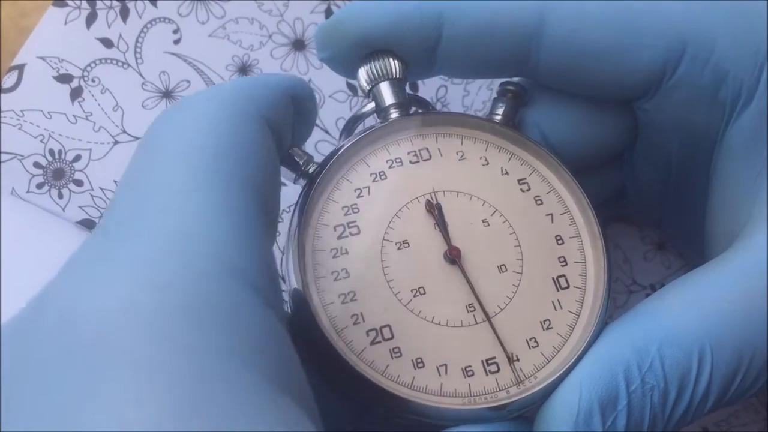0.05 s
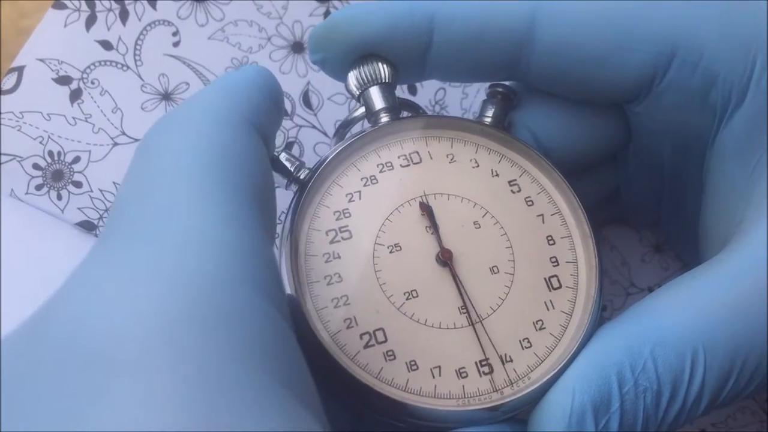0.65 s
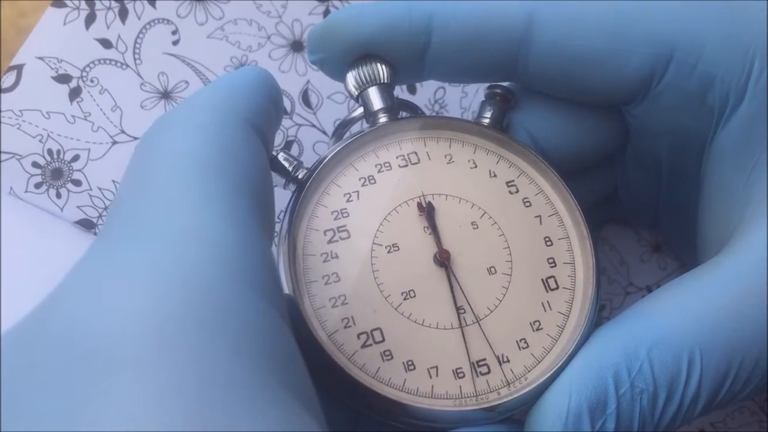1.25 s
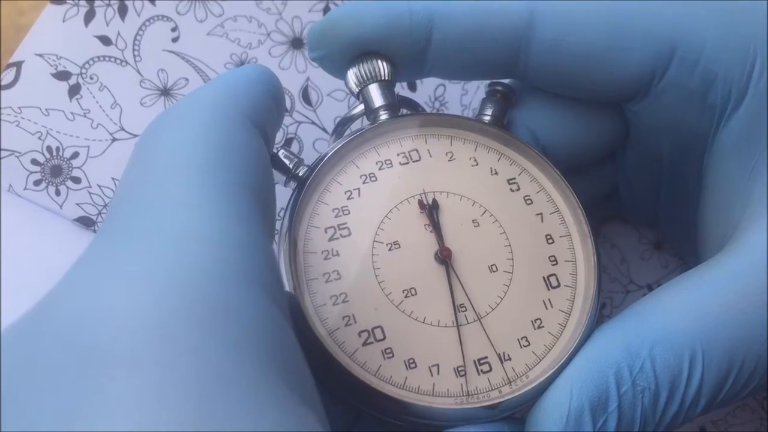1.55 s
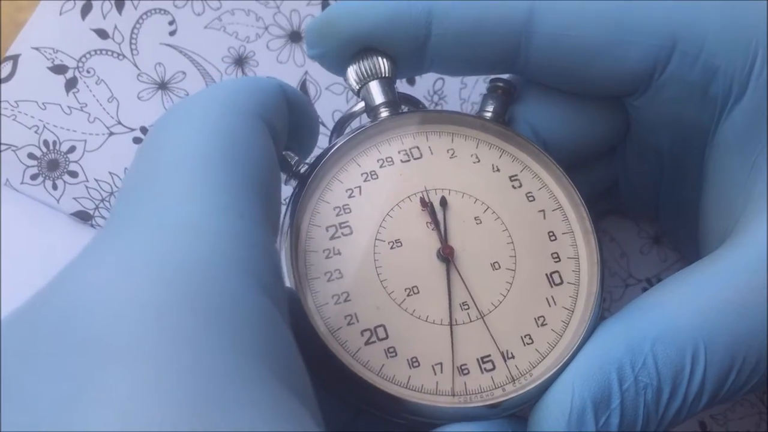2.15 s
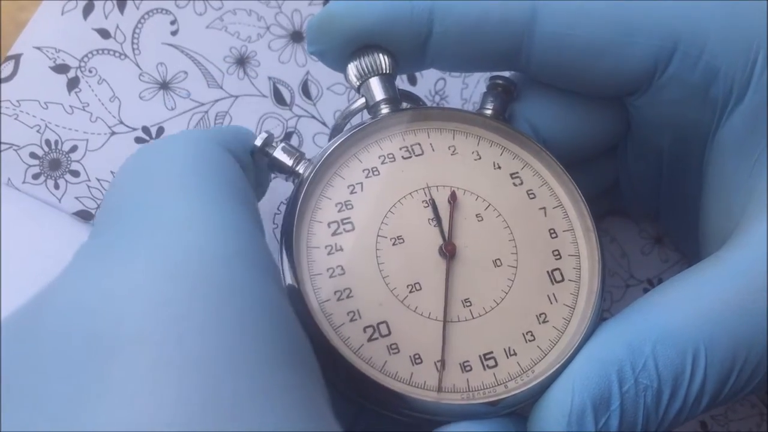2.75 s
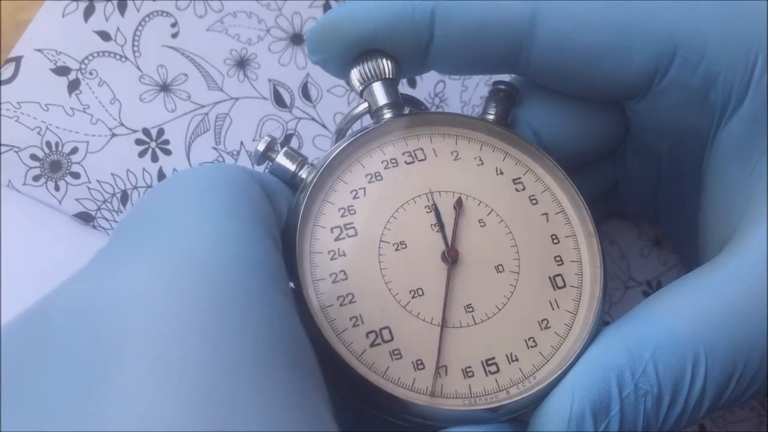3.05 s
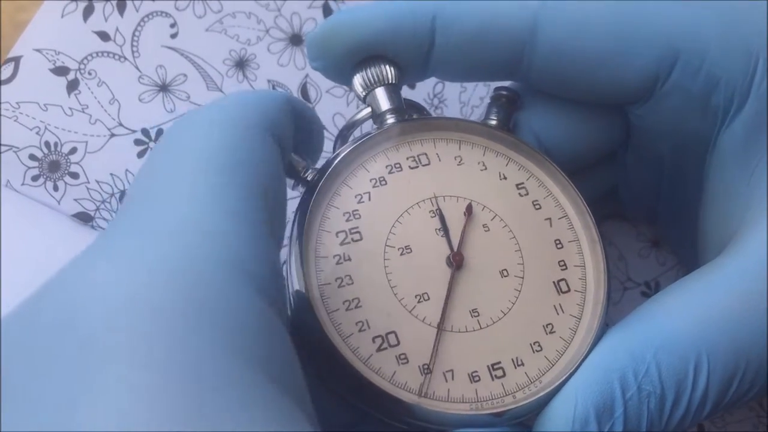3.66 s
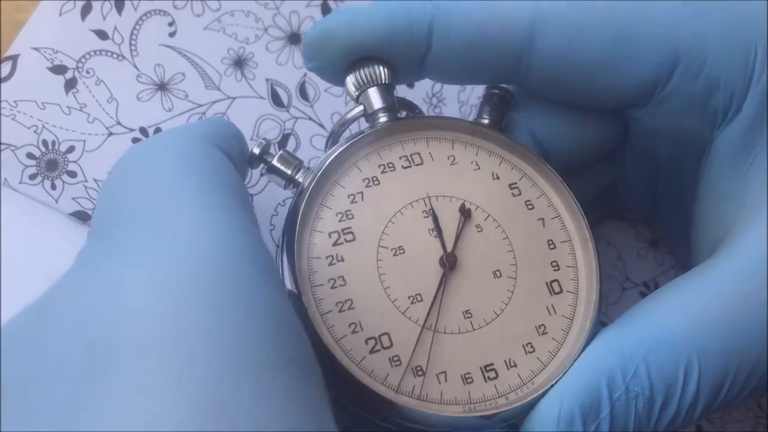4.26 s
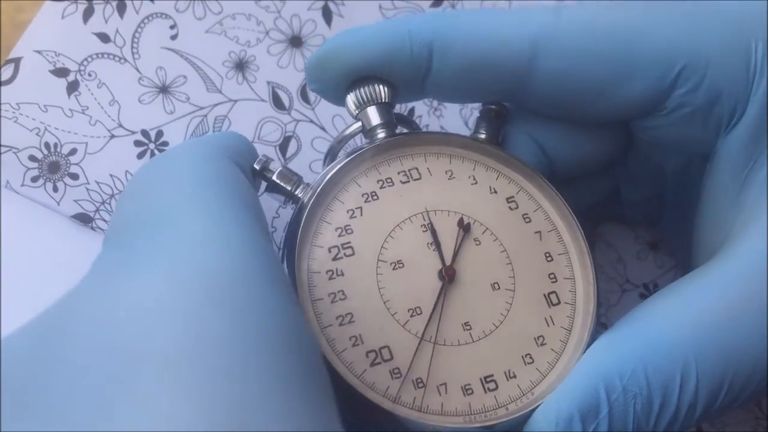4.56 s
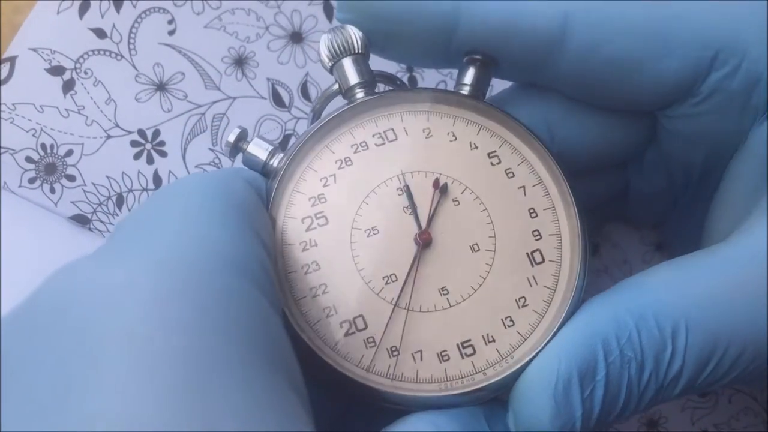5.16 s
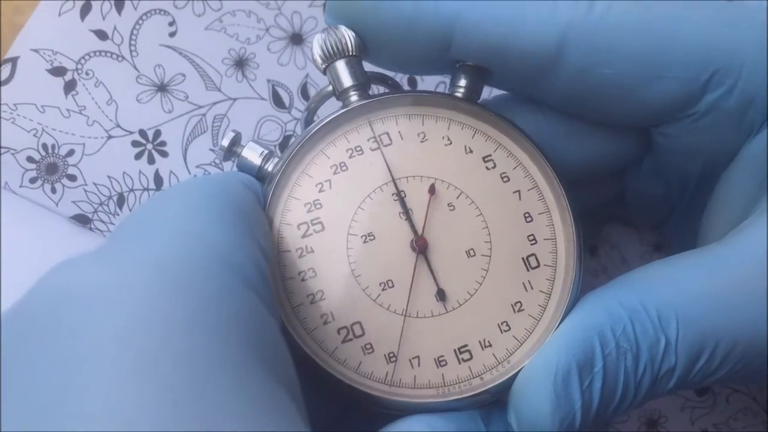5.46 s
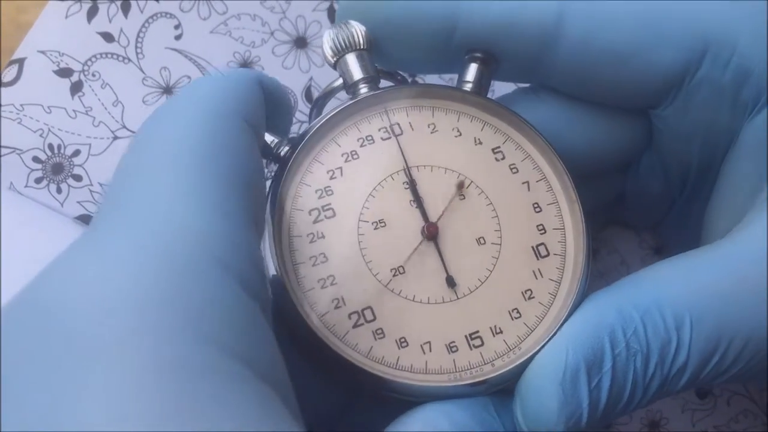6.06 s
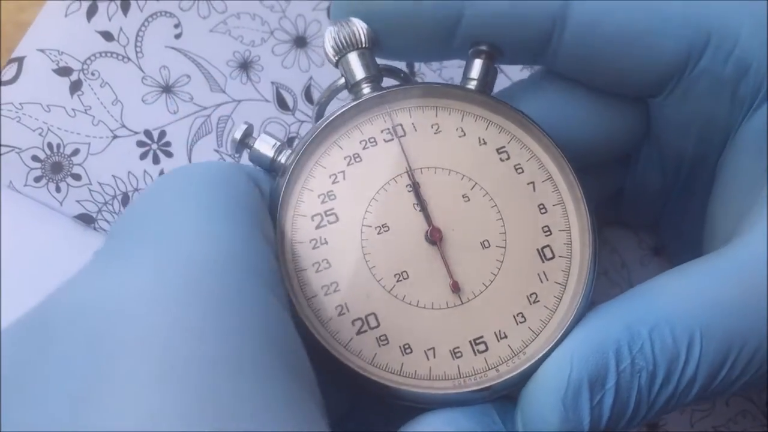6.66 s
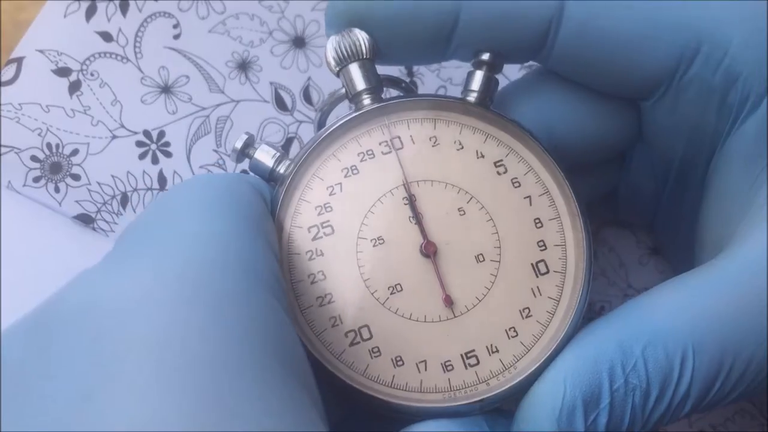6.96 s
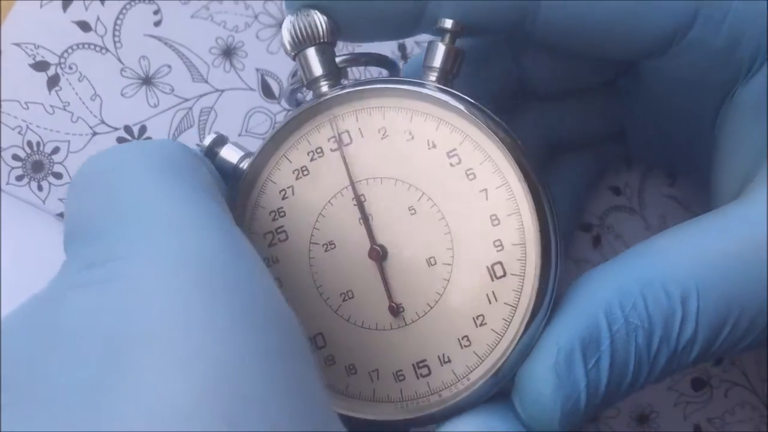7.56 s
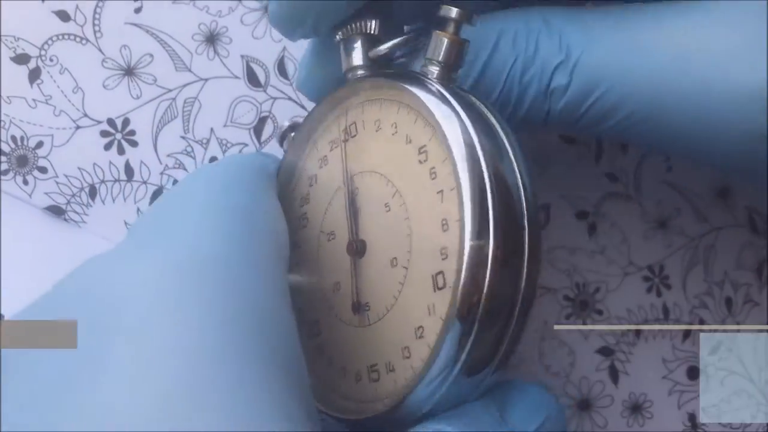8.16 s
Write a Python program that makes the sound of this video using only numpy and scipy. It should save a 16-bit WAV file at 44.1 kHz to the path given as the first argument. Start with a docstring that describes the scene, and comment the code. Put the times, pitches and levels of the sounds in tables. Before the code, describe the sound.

A steel mechanical stopwatch ticks faintly, about five beats a second, close to the microphone in a quiet room with a low rumble and a thin electrical buzz. In the first 0.6 seconds its side button is pressed and released twice, making sharp metallic clicks with a slight spring ring. A few very faint, distant bird chirps come in the first two seconds. The button clicks down and back at 2.4 and 2.7 seconds, then more lightly at 3.8 and 4. At 4.5 seconds the crown gives the loudest snap and the ticking stops. Small clicks follow, then a ringing reset snap at 5.4 seconds. More clicks come near 5.9, 6.2 and 6.5 seconds. From about 7 seconds rubber gloves rustle softly as the watch is turned over, with a click and dull knock at 7.5 and light taps just after 8.

```python
"""A quiet room, the microphone close to a steel mechanical stopwatch worked with gloved hands.
Farthest off are a low rumble and a few bird chirps, with a thin electrical buzz over them.
Up close the movement ticks faintly until the crown stops it; the hands are reset and the watch is
turned over, gloves rustling. Loudest are the buttons: each snaps a lever against its stop,
ringing the plate and case back, and small springs ring on."""
import sys
import numpy as np
from scipy import signal
from scipy.fft import rfft, irfft, next_fast_len
from scipy.io import wavfile
from scipy.ndimage import map_coordinates

SR = 44100
rng = np.random.default_rng(int(sys.argv[2]) if len(sys.argv) > 2 else 0)


def pcm_store(signal):
    """Save signal as 16-bit PCM."""
    levels = np.round(np.clip(np.atleast_2d(signal), -1, 1) * 32767)
    wavfile.write(sys.argv[1], SR, levels.astype(np.int16).T)


N = 366030
LEAD_S = .004  # time for the scrape before each snap


def amp(db):
    """Decibels to gain."""
    return 10 ** (np.asarray(db) / 20)


def unit(x):
    """Scale to rms 1."""
    return x / np.sqrt(np.mean(x ** 2) + 1e-20)


def sized(x, db):
    """Give a click the energy of 10 ms at this level."""
    return amp(db) * x / np.sqrt(np.sum(x ** 2) / (.01 * SR) + 1e-20)


def along(points, hz):
    """Read a curve of (freq_hz, value) points on a log frequency axis."""
    freqs, values = np.transpose(points)
    return np.interp(np.log(hz + 1), np.log(freqs + 1), values)


def seconds(size):
    """Time axis."""
    return np.arange(size) / SR


def fade(t, t60):
    """Exponential decay that starts at t = 0."""
    return (t >= 0) * np.exp(-np.log(1000) * np.abs(t) / t60)


def add(track, start_s, sound):
    """Mix a sound in at start_s."""
    i = max(0, round(start_s * SR))
    track[i:i + len(sound)] += sound[:max(0, N - i)]


def filtered(x, gain):
    """Apply a gain that depends on frequency."""
    size = next_fast_len(len(x) + 8192)
    return irfft(rfft(x, size) * gain(np.fft.rfftfreq(size, 1 / SR)), size)[:len(x)]


def coloured(x, spectrum):
    """Shape x by a spectrum, at rms 1."""
    return unit(filtered(x, lambda hz: amp(along(spectrum, hz))))


def wobble(rate_hz):
    """A smooth random curve, rate_hz knots a second."""
    knots = rng.standard_normal(int(N * rate_hz / SR) + 4)
    return map_coordinates(knots, [np.arange(N) * rate_hz / SR])


# The room's low rumble: freq_hz, relative_db
RUMBLE_SPECTRUM = [(20, -44.5), (40, -9), (55, -7), (70, 2), (90, -1.5), (130, -5.5), (200, -11.5),
                   (300, -21.5), (450, -34), (900, -45), (3000, -65)]
# Faint hiss all around the microphone: freq_hz, relative_db
AIR_SPECTRUM = [(150, -17.5), (450, 2), (750, -0.5), (950, 2), (1400, -3.5), (2200, -10.5), (4500, -10.5),
                (10000, -12.5), (16000, -28.5)]

def room_tone(rumble_db=-49.5, air_db=-67.0, hum_hz=71.7, hum_db=-57, handling_db=1.0):
    """Low room rumble, swelling as the hands turn the watch, with a wavering hum and an even hiss."""
    t = seconds(N)
    turning_db = np.interp(t, [7, 8], [0, handling_db])
    swell = amp(rumble_db + turning_db + 0.56 * wobble(2.8))
    rumble = swell * coloured(rng.standard_normal(N), RUMBLE_SPECTRUM)
    hum_peak = amp(hum_db + 1.5 * wobble(3)) * np.sqrt(2)
    hum = hum_peak * np.sin(2 * np.pi * hum_hz * t + 0.94 * wobble(6))
    return rumble + hum + amp(air_db) * coloured(rng.standard_normal(N), AIR_SPECTRUM)


# How long the room rings: freq_hz, t60_s
ROOM_DECAY = [(300, 0.093), (2000, 0.21), (6000, 0.11), (14000, 0.033)]

def room_echo(x):
    """The walls return a short diffuse tail whose treble dies first."""
    hz, t, bands = signal.stft(rng.standard_normal(SR // 2), SR, nperseg=256)
    tail = signal.istft(bands * fade(t, along(ROOM_DECAY, hz)[:, None]), SR, nperseg=256)[1]
    tail *= 1 - np.exp(-seconds(len(tail)) / 0.0013)
    return signal.fftconvolve(x, tail / np.linalg.norm(tail))[:N]


# A bird far outside: start_s, pitch_hz, level_db (before trim_db), droop_share (of the pitch)
BIRD_CHIRPS = [(.432, 3840, -55.5, -0.14), (0.822, 4420, -53, 0.17), (1.221, 3700, -53.5, 0.102),
               (2.02, 4320, -62, 0.15)]

def far_bird(length_s=0.049, second_voice_db=-9, second_ratio=1.14, trim_db=-6.5):
    """Far chirps: the pitch arches or dips, with a weaker second voice above it."""
    out, t = np.zeros(N), seconds(4000)
    progress = np.clip(t / length_s, 0, 1)
    for start_s, hz, db, droop in BIRD_CHIRPS:
        pitch = hz * (1 - droop * np.sin(np.pi * .75 * (progress - .33)) ** 2)
        phase = 2 * np.pi * np.cumsum(pitch) / SR
        voices = np.sin(phase) + amp(second_voice_db) * np.sin(second_ratio * phase)
        add(out, start_s, amp(db + trim_db) * np.sin(np.pi * progress) * voices)
    return out


# One spike of the buzz: freq_hz, relative_db
SPIKE_SPECTRUM = [(1000, -43), (4400, -35), (5700, -5), (7000, -2), (7900, 3.5), (8800, -5.5), (9600, -8.5),
                  (11000, -24), (14000, -21), (16000, -25)]

def electrical_buzz(db=-61.5, rate_hz=59.9906, first_s=.0052, scatter_db=0.65, jitter_s=.00007):
    """Electrical interference: a thin, sharp spike sixty times a second, slightly unsteady."""
    out, size = np.zeros(N), 1024
    cepstrum = irfft(np.log(amp(along(SPIKE_SPECTRUM, np.fft.rfftfreq(size, 1 / SR)))))
    fold = np.r_[1, np.full(size // 2 - 1, 2), np.zeros(size // 2)]
    spike = irfft(np.exp(rfft(cepstrum * fold)))  # minimum phase: a sharp front, then a short ring
    for start_s in np.arange(first_s, N / SR, 1 / rate_hz):
        add(out, start_s + rng.normal(0, jitter_s), spike * amp(rng.normal(0, scatter_db)))
    return amp(db) * unit(out)


# Two spells of faint hiss: start_s, length_s
FLAT_HISS_SPANS = [(4.55, .37), (5.83, .38)]
# Their colour: freq_hz, relative_db
FLAT_HISS_SPECTRUM = [(1000, -12), (3000, -2), (6000, 0), (15500, -1)]

def flat_hiss(db=-66, edge_s=.015):
    """A faint, flat hiss that follows two of the clicks and stops abruptly."""
    t = seconds(N)
    gate = sum(np.clip(np.minimum(t - start_s, start_s + length_s - t) / edge_s + 1, 0, 1)
               for start_s, length_s in FLAT_HISS_SPANS)
    return amp(db) * gate * coloured(rng.standard_normal(N), FLAT_HISS_SPECTRUM)


# Gloves slide near the microphone: start_s, length_s, rub_db, hiss_db
GLOVE_SLIDES = [(2.51, .08, -68, -64), (4.55, .37, -69, -66), (5.207, .032, -52.3, -78),
                (5.275, .035, -59.5, -75), (5.92, .27, -69, -66), (6.98, .35, -71, -74),
                (7.365, .12, -57, -70), (7.4, .37, -58.2, -66), (7.55, .06, -65, -59),
                (7.86, .18, -62, -56), (8.04, .22, -66, -66)]
# Their midrange rub and their bright hiss: freq_hz, relative_db
RUB_SPECTRUM = [(300, -33), (700, -8), (930, 2.5), (1250, -0.5), (1570, 2), (2500, -3.5), (3300, -6),
                (4200, -5), (7000, -12), (16000, -41)]
HISS_SPECTRUM = [(1000, -26.5), (3000, -2.5), (4500, -2.5), (7000, 5.5), (9500, -5.5), (12000, -12.5),
                 (16000, -15)]

def gloves(rest_rub_db=-84, rest_hiss_db=-76, attack_share=.12, release_share=.2,
           grain_db=4, flutter_db=1.2):
    """Rubber slides over steel and cloth in countless tiny slips; each slide swells, holds and dies."""
    out, t = np.zeros(N), seconds(N)
    powers = np.outer(amp([rest_rub_db, rest_hiss_db]) ** 2, np.ones(N))  # merely holding the watch
    for start_s, length_s, *levels_db in GLOVE_SLIDES:
        progress = (t - start_s) / length_s
        swell = np.exp(np.minimum(progress, 0) / attack_share
                       - np.maximum(progress - 1, 0) / release_share)
        powers += np.outer(amp(levels_db), swell) ** 2
    grip = amp(flutter_db * wobble(35))
    for power, spectrum in zip(powers, (RUB_SPECTRUM, HISS_SPECTRUM)):
        slips = rng.standard_normal(N) * amp(grain_db * wobble(1200))
        out += np.sqrt(power) * coloured(slips, spectrum)
    return grip * out


# Dull knocks of the handled watch: start_s, peak_db (before trim_db)
HANDLING_KNOCKS = [(7.473, -31), (8.093, -39), (8.117, -50)]
# The modes of a knock: pitch_hz, t60_s, relative_db
BUMP_MODES = [(653, .022, -7), (900, 0.014, 0.5), (1190, 0.012, 4.5)]

def knocks(trim_db=-1, reset_s=5.447, reset_db=-31, reset_hz=290, reset_t60=0.023):
    """The watch bumps softly in the hands, and the reset hammer gives the whole case a low push."""
    out, t = np.zeros(N), seconds(4000)
    bump = sum(amp(db) * fade(t, t60) * np.sin(2 * np.pi * hz * t) for hz, t60, db in BUMP_MODES)
    bump *= 1 - np.exp(-t / 0.0035)
    for start_s, db in HANDLING_KNOCKS:
        add(out, start_s, amp(db + trim_db) * bump / np.abs(bump).max())
    add(out, reset_s, amp(reset_db) * fade(t, reset_t60) * np.sin(2 * np.pi * reset_hz * t))
    return out


def ring(modes, t, hardness, attack_s):
    """A struck part rings; hardness 0 to 1 blends from side button to crown and aligns the phases."""
    hz, t60, side_db, crown_db = np.transpose(modes)[:, :, None]
    gains = amp(side_db + hardness * (crown_db - side_db) + rng.normal(0, 1.24, hz.shape))
    phase = 0.85 * (1 - hardness) * rng.uniform(-0.94, 1, hz.shape)
    waves = gains * fade(t, t60) * np.sin(2 * np.pi * (hz * t + phase))
    return waves.sum(0) * (1 - np.exp(-np.maximum(t, 0) / attack_s))


# Modes of the plate, levers and escape wheel, struck at the side button or at the crown:
# pitch_hz, t60_s, side_db, crown_db
PLATE_MODES = [(2083, 0.023, -13, -3.5), (2425, 0.023, -6, -6), (2593, .014, 10.5, -4),
               (2787, 0.022, -9, -3), (3215, 0.015, -6.5, -12)]
LEVER_MODES = [(3710, 0.012, -23, -14), (4300, 0.016, -28.5, -24), (4620, .013, -35, -12),
               (5170, .01, -9.5, 4), (5620, 0.0043, -14, 10), (6165, 0.007, 4, -3.5),
               (6980, 0.0083, -1, -10), (7500, 0.0084, -8.5, 0.5), (7760, 0.0034, -17.5, -14),
               (8720, 0.011, -13, -13), (9600, .008, -35, -39)]
WHEEL_MODES = [(10400, .004, 0, 0), (12600, .002, -4, -4), (15450, .007, -8, -8)]

def escapement(first_s=.0975, beat_s=.20117, stop_s=4.5, tock_s=.089, unlock_s=.017,
               tick_db=-53.0, tock_db=-59, unlock_db=-62, plate_db=-13, unlock_plate_db=-6,
               grit_t60=0.027, sparkle_db=-14.5):
    """The balance swings five times a second; each way it unlocks the wheel, then a tooth drops."""
    out, t = np.zeros(N), seconds(1500)
    for start_s in np.arange(first_s, stop_s, beat_s):
        drops = [(start_s, tick_db, plate_db), (start_s + tock_s, tock_db, plate_db)]
        unlocks = [(at_s - unlock_s + rng.normal(0, 0.0053), unlock_db, unlock_plate_db)
                   for at_s, _, _ in drops]
        for at_s, db, body_db in drops + unlocks:
            db += rng.normal(0, 1.6)
            tooth = ring(LEVER_MODES, t, hardness=0.043, attack_s=0.00039)
            tooth += ring(LEVER_MODES, t - rng.uniform(0.00101, 0.0023), hardness=.05, attack_s=.0006)
            # the sliding tooth drives the plate unevenly
            slide = fade(t, grit_t60) * rng.standard_normal(len(t))
            plate_ring = ring(PLATE_MODES, t, hardness=0.039, attack_s=0.00067)
            plate = signal.fftconvolve(slide, plate_ring)[:len(t)]
            sparkle = ring(WHEEL_MODES, t, hardness=0, attack_s=.0003)
            tick = sized(tooth, db) + sized(plate, db + body_db) + sized(sparkle, db + sparkle_db)
            add(out, at_s - .001, tick)
    return out


# Modes of the case back: pitch_hz, t60_s, side_db, crown_db
BACK_MODES = [(954, .008, -12, -7), (1160, 0.0099, -5, -15), (1514, 0.012, 1, 0), (1630, 0.0062, -3.5, 3)]
# The crack of steel on steel: freq_hz, relative_db
CRACK_SPECTRUM = [(1000, -37), (2500, -4.5), (4000, -3), (6000, 2), (8000, 2), (9500, -10), (11000, -15),
                  (15500, -13), (16500, -16)]

def snap(lever_db, back_db, plate_db, lag_s, rebound_db, hardness, crack_db=-10,
         crack_t60=0.0082, scrape_s=0.0033, rattle_db=-31, rattle_t60=.06):
    """A lever scrapes off its catch, hits its stop and rebounds; loose parts rattle on.
    All other levels are relative to the lever's."""
    t = seconds(4400) - LEAD_S
    contacts = [(t, 1), (t - lag_s, amp(rebound_db))]

    def struck(modes, attack_s):
        return sum(gain * ring(modes, age, hardness, attack_s) for age, gain in contacts)

    scrape_db = -32 - .45 * lever_db  # stands out more in light snaps
    scrape = amp(scrape_db) * (t < 0) * np.exp(-np.abs(t) / scrape_s)
    impacts = sum(gain * fade(age, crack_t60) for age, gain in contacts)
    rattle = amp(rattle_db) * fade(t, rattle_t60)
    crack = coloured((impacts + scrape + rattle) * rng.standard_normal(len(t)), CRACK_SPECTRUM)
    steel = unit(struck(LEVER_MODES, attack_s=0.00027)) + amp(crack_db) * crack
    back = sized(struck(BACK_MODES, attack_s=0.00055), back_db)
    plate = sized(struck(PLATE_MODES, attack_s=0.00056), plate_db)
    return sized(steel, lever_db) + amp(lever_db) * (back + plate)


def after_ring(modes, twin_db=-8, detune_share=0.0087):
    """Steel rings on after a snap, each mode beating against a close twin."""
    out, t = np.zeros(SR // 2), seconds(SR // 2)
    for hz, t60, db in modes:
        twin = amp(twin_db) * np.sin(2 * np.pi * (hz * (1 + detune_share) * t + rng.random()))
        out += amp(db) * fade(t, t60) * (np.sin(2 * np.pi * hz * t) + twin)
    return out


# Thin ticks of a button's catch: start_s, lever_db
CATCH_TICKS = [(.2407, -42), (.6125, -42), (3.569, -43.5), (4.6175, -47), (4.8492, -47.5)]
# Duller taps as a finger takes up a button's slack: start_s, plate_db
FINGER_NUDGES = [(.354, -53), (2.329, -59), (3.7176, -59), (4.4715, -56), (4.4828, -41.5), (4.7143, -57),
                 (4.864, -50.6), (5.2616, -56), (5.692, -60.5), (6.15, -59), (6.1912, -57), (8.1326, -53.5),
                 (8.168, -58), (8.2198, -50.5)]

def touches(plate_over_lever_db=5):
    """Light contacts between the snaps: a catch rings the levers, a soft nudge mostly the plate."""
    out = np.zeros(N)
    for start_s, db in CATCH_TICKS:
        tick = snap(db, back_db=-26, plate_db=-15, lag_s=.001, rebound_db=-2, hardness=.55, crack_db=-6)
        add(out, start_s - LEAD_S, tick)
    for start_s, db in FINGER_NUDGES:
        tap = snap(db - plate_over_lever_db, back_db=-14, plate_db=plate_over_lever_db,
                   lag_s=.0018, rebound_db=0, hardness=.08, crack_db=-12)
        add(out, start_s - LEAD_S, tap)
    return out


# The side button goes home: start_s, lever_db, back_db, plate_db, lag_s, rebound_db, ring_gain_db
SIDE_PRESSES = [(.0492, -25.5, -8, -7, .0014, 3.5, -1), (.3857, -27.5, -13.5, -9, .0012, 1.5, -7),
                (2.4262, -25.5, -10.5, -12.5, .0011, 8, -1), (3.7882, -30, -16, -10.5, .0014, 1, -14),
                (6.2181, -32.5, -3.2, -1.2, .00054, -2.5, -10)]
# Ringing after a press, a short plate ring and two faint, longer tones:
# pitch_hz, t60_s, level_db (before ring_gain_db)
PRESS_RING_MODES = [(1805, .32, -58.5), (2100, .048, -36), (5165, .45, -59)]
# The button springs back: start_s, lever_db, plate_db, low_spring_db, high_spring_db
SIDE_RELEASES = [(.2531, -35, -7, -56, -68), (.5876, -36.5, -3, -76, -74), (2.6858, -33, -8, -54, -68),
                 (4.0308, -35.5, -5.5, -78, -76), (6.5124, -35.4, -4.5, -55, -54.5)]

def side_button(ring_delay_s=.0016, low_hz=1590, low_t60=.26, high_hz=5168, high_t60=.34):
    """A press drives the lever into the case and rings the plate; the lighter return frees springs."""
    out = np.zeros(N)
    for start_s, db, back_db, plate_db, lag_s, rebound_db, ring_gain_db in SIDE_PRESSES:
        add(out, start_s - LEAD_S, snap(db, back_db, plate_db, lag_s, rebound_db, hardness=.04))
        add(out, start_s + ring_delay_s, amp(ring_gain_db) * after_ring(PRESS_RING_MODES))
    for start_s, db, plate_db, low_db, high_db in SIDE_RELEASES:
        click = snap(db, back_db=-25, plate_db=plate_db, lag_s=.00098, rebound_db=2.5,
                     hardness=.01, crack_db=-8)
        springs = after_ring([(low_hz, low_t60, low_db), (high_hz, high_t60, high_db)])
        add(out, start_s - LEAD_S, click)
        add(out, start_s + ring_delay_s, springs)
    return out


# The crown stops the watch, then resets it: start_s, lever_db, back_db, lag_s, rebound_db, hardness
STOP_BLOW = (4.5217, -16.5, -35, .0013, -12, .91)
RESET_BLOW = (5.4472, -22.8, -14.5, .0041, 0.5, .4)
# The reset hammer's spring: pitch_hz, t60_s, level_db
RESET_SPRING_MODES = [(1483, .51, -51), (2910, .079, -42.5)]
# The crown slips back in its stem: start_s, lever_db, plate_db
STEM_RETURNS = [(4.8778, -38, 1), (5.8135, -33, -9.5), (5.9109, -26.5, -15.5), (7.4613, -37.5, -14.5)]

def crown_button(blow_plate_db=-9.8, spring_delay_s=.004):
    """The crown strikes hardest; the reset hammer leaves its spring ringing, and the stem slips back."""
    out = np.zeros(N)
    for start_s, db, back_db, lag_s, rebound_db, hardness in (STOP_BLOW, RESET_BLOW):
        blow = snap(db, back_db, blow_plate_db, lag_s, rebound_db, hardness, crack_db=-11.5)
        add(out, start_s - LEAD_S, blow)
    add(out, RESET_BLOW[0] + spring_delay_s, after_ring(RESET_SPRING_MODES))
    for start_s, db, plate_db in STEM_RETURNS:
        click = snap(db, back_db=-30, plate_db=plate_db, lag_s=.0012, rebound_db=-1, hardness=.33)
        add(out, start_s - LEAD_S, click)
    return out


def radiated(x, corner_hz=620):
    """The small case radiates hardly any bass."""
    return signal.sosfilt(signal.butter(2, corner_hz, "high", fs=SR, output="sos"), x)


def scene(room_db=-24, bird_echo_db=-5.5):
    """At one microphone the watch is close and nearly dry; the far bird echoes outside, then indoors."""
    watch = radiated(side_button() + crown_button() + touches() + escapement()) + knocks()
    chirps = far_bird()
    echoes = amp(room_db) * room_echo(watch) + amp(bird_echo_db) * room_echo(room_echo(chirps))
    return (watch + chirps + echoes + gloves() + flat_hiss() + electrical_buzz() + room_tone())[None]


def record(dry, top_hz=15950):
    """The recorder keeps nothing above its band limit."""
    return np.array([filtered(x, lambda hz: 1 / np.sqrt(1 + (hz / top_hz) ** 160)) for x in dry])


dry = scene()
out = record(dry)
pcm_store(out)
```